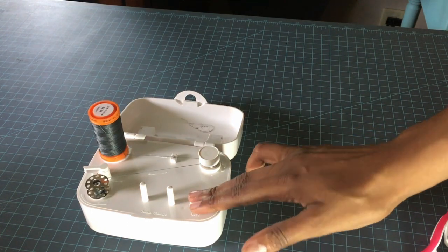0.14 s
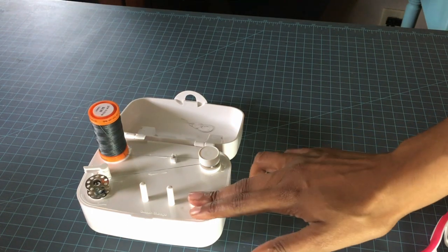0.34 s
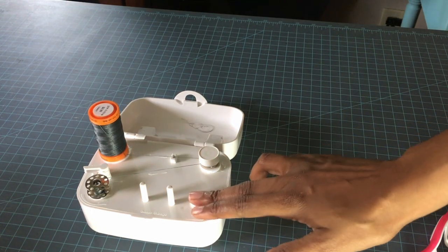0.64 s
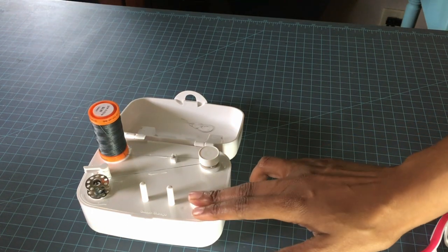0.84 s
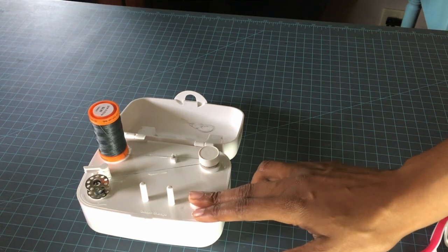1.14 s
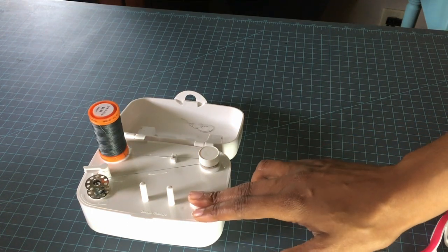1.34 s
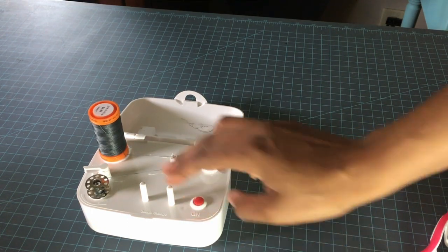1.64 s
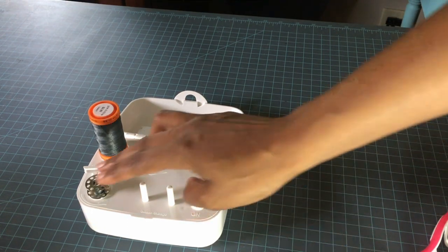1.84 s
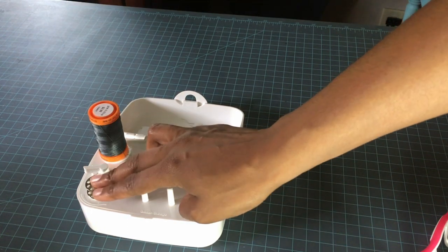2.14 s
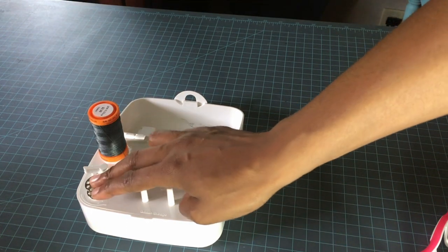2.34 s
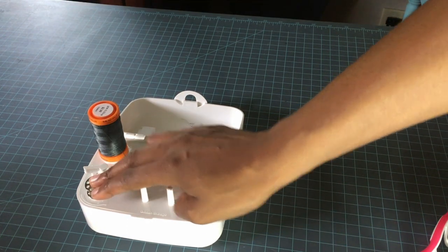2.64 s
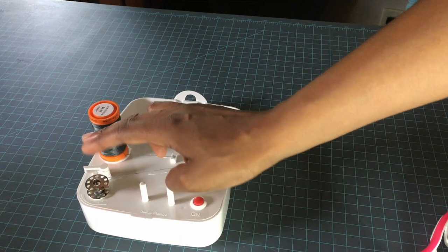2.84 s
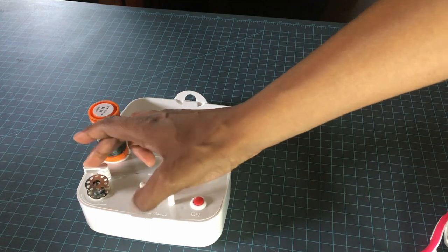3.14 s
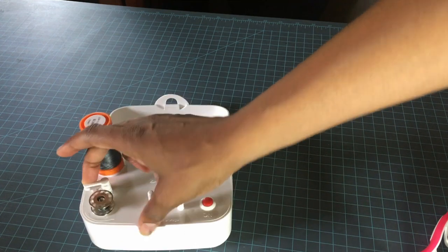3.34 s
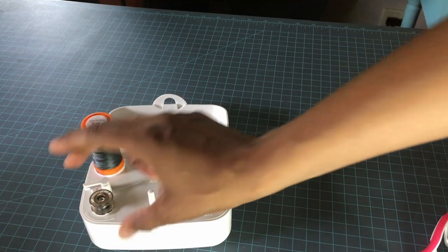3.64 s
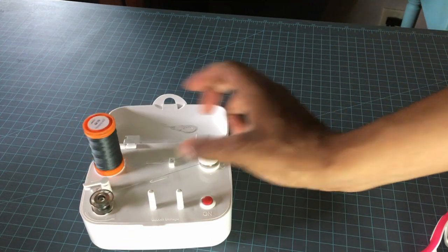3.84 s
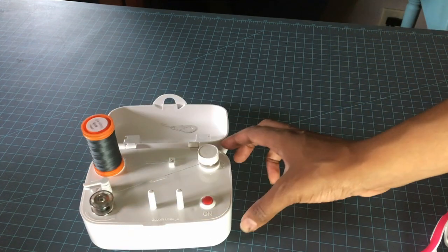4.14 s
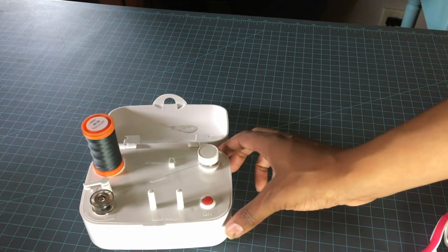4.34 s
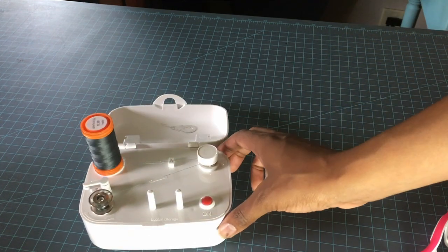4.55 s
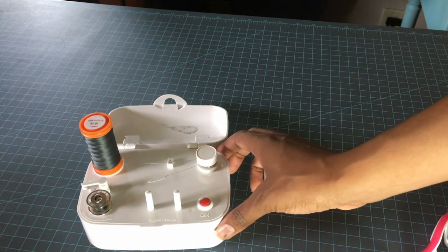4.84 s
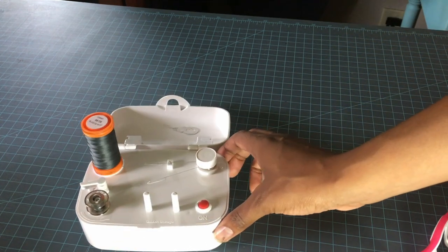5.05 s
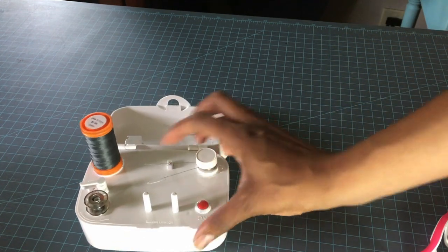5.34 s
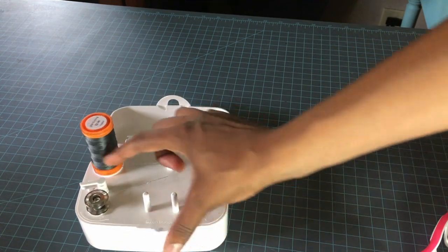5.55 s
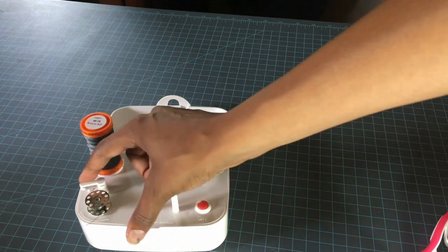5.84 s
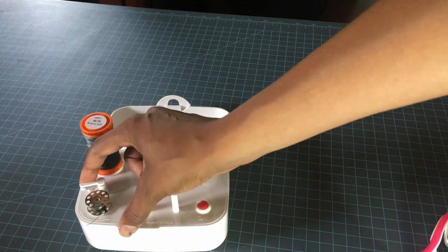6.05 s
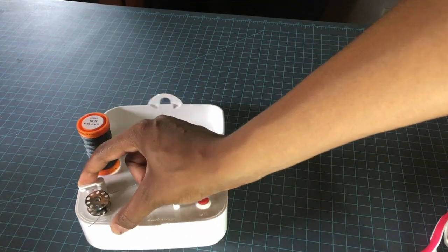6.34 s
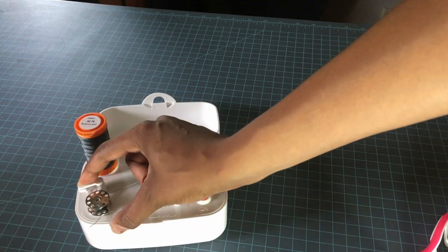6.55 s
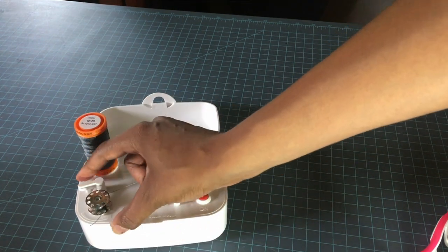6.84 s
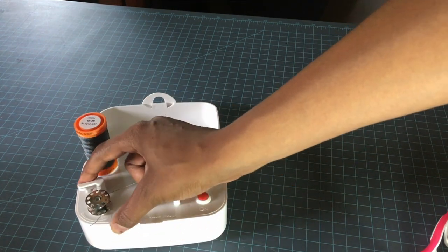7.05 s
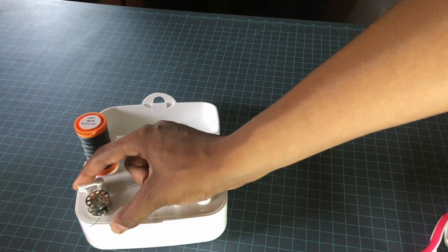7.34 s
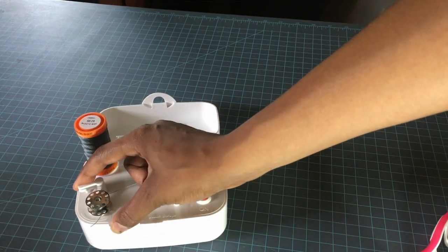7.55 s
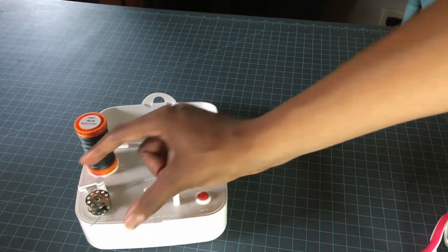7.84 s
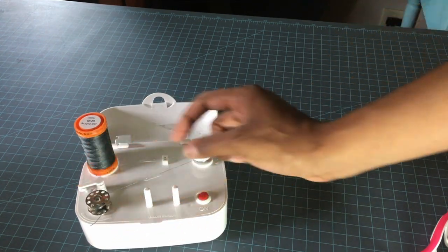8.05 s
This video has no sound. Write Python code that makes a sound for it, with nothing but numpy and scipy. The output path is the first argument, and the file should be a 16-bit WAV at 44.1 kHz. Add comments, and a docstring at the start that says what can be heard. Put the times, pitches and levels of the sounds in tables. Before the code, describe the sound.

Sharp plastic button clicks with brief ring, then a small winder whirrs up for two seconds and runs down, followed by sparse soft taps.

```python
"""The winding of a small plastic battery bobbin winder whirrs up and runs down on a cutting mat in a quiet room:
dense friction contacts excite resonances, and the thread spool rubs harder once in every turn.
Before it, the button is pressed and let go twice and fingers knock on the case, ringing its modes and the room.
Afterwards the spool creeps on once more and a few taps follow. Filtered noise gives the handling rumble,
soft thuds, brushing and still air; a wavering low tone booms in the table at each shove."""
import sys
import numpy as np
from scipy import signal
from scipy.fft import rfft, irfft, next_fast_len
from scipy.io import wavfile
from scipy.ndimage import uniform_filter1d

SR = 44100
rng = np.random.default_rng(int(sys.argv[2]) if len(sys.argv) > 2 else 0)


def master(y):
    """Save y as 16-bit WAV."""
    cut = np.clip(np.atleast_2d(y).T, -1, 1)
    pcm = np.round(cut * 32767)  # scale
    wavfile.write(sys.argv[1], SR, pcm.astype(np.int16))


N = 361619
TIME = np.arange(N) / SR   # seconds

# rubbing of the winding as it runs up and down, before unevenness and surges: time_s, level_db
RUN_LEVEL = [(3.22, -89), (3.28, -59.5), (3.38, -51), (3.46, -46), (3.6, -49.5), (3.66, -47.5),
             (3.97, -42.5), (4.4, -41.5), (4.66, -44.5), (4.74, -50.5), (5.22, -52), (5.32, -60),
             (5.4, -47.5), (5.48, -55), (5.65, -60.5), (5.75, -58), (5.84, -72.5)]
# broad spectrum of the rubbing: frequency_hz, level_db
RUN_COLOUR = [(53, -14), (90, 3), (133, 0), (237, -13), (288, -7), (373, -13), (515, -4.5), (599, -4.5),
              (1050, 0.5), (1550, -6.5), (1840, -1.5), (3290, -10.5), (3740, -21.5), (8480, -36),
              (15500, -53)]
# resonances that the rubbing excites: centre_hz, width_hz, boost_db
RUN_RESONANCES = [(126, 35, 8.5), (308, 130, 4), (509, 37, 3), (643, 155, -8.5), (1354, 110, 9),
                  (1590, 78, 3.5), (1680, 12, 10), (2490, 104, 7), (426, 71, 2.5), (3180, 180, -3.5),
                  (3530, 100, -6.5), (5470, 190, 2.5), (7830, 480, 3.5), (10570, 960, 5.5)]
# the hollow of the case colours the drone: frequency_hz, level_db
DRONE_COLOUR = [(100, -2.5), (165, -2), (240, 1), (380, 2.5), (560, 0)]
FULL_RUB_DB = -41.5   # rubbing level at full speed
DRONE_DB, DRONE_FOLLOWS = -48, 0.75   # case drone at full speed; share of the rubbing's swing in dB
HISS_DB, HISS_FOLLOWS = -51.5, 1      # the same for the hiss of the contacts
DRONE_LOW_HZ = 113   # the small case radiates little below this


def whirr(rattle_db=2.5, lurch_db=0.5, wander_db=1.5, bright_db=0.25, bright_hz=2100, drone_throb=0.82):
    """Friction excitation: uneven spool contacts drive resonances, with a case drone below and hiss above."""
    s, db = np.transpose(RUN_LEVEL)
    surge_db, speed = spool()
    uneven = from_db(rattle_db * drift(per_s=130) + lurch_db * drift(per_s=35))
    contacts = []
    for _ in range(2):
        rubbed = rubbing(per_s=3500, size_db=1.5) * uneven
        contacts.append(coloured(room(rubbed, wet_db=-5.0), RUN_COLOUR, RUN_RESONANCES))

    # the contact point wanders, so parts of the case take turns; faster rubbing is brighter
    faster = speed - np.median(speed)
    edges = np.geomspace(650, 3700, 9)   # Hz
    middle = 0
    for k, (low_hz, high_hz) in enumerate(zip(edges, edges[1:])):
        nearness = np.exp(-10 * np.log(np.sqrt(low_hz * high_hz) / bright_hz) ** 2)
        lift_db = bright_db * faster * nearness
        part = band(contacts[k % 2], (low_hz, high_hz), order=2)
        middle = middle + part * from_db(lift_db + wander_db * drift(per_s=26))
    middle = rms_one(middle) * level(s, db)

    hiss_db = HISS_DB + HISS_FOLLOWS * (db - FULL_RUB_DB)
    hiss = rms_one(band(contacts[0], 4950, "high")) * level(s, hiss_db)
    drone_db = DRONE_DB + DRONE_FOLLOWS * (db - FULL_RUB_DB)
    drone = coloured(band(contacts[1], (DRONE_LOW_HZ, 650)), DRONE_COLOUR) * level(s, drone_db)
    return (middle + hiss) * from_db(surge_db) + drone * from_db(drone_throb * surge_db)


# speed of the thread spool: time_s, speed_turns_per_s
SPOOL_SPEED = [(3.3, 6.4), (3.55, 5.6), (3.68, 8.2), (3.93, 12), (4.45, 11.9), (4.62, 9.2), (4.69, 5.5),
               (4.9, 6.1), (5.08, 4.1), (5.7, 6.5)]
BEARS_AT_S = 3.856   # one of the moments when the spool bears hardest on its pin
SURGE_DB, SURGE_SPREAD_DB = 2, 0.35   # swing of rubbing in a turn at full speed; its random variation
SURGE_DB_PER_LOST_TURN = 0.3   # the swing deepens as the spool slows, per turn a second


def spool():
    """Rotational modulation: the bearing force peaks once a turn; gives swing in dB and turns per second."""
    speed = np.interp(TIME, *np.transpose(SPOOL_SPEED))
    turns = np.cumsum(speed) / SR
    turns_from_peak = turns - np.interp(BEARS_AT_S, TIME, turns)
    bearing = np.cos(np.pi * turns_from_peak) ** 4
    lost_turns = speed.max() - speed
    depth_db = SURGE_DB + SURGE_DB_PER_LOST_TURN * lost_turns + SURGE_SPREAD_DB * drift(per_s=8)
    return depth_db * (bearing - 0.5), speed


def rubbing(per_s, size_db):
    """Friction as shot noise: dense tiny contacts at random moments, of uneven size and either sign."""
    sizes = from_db(size_db * np.minimum(rng.exponential(1, N), 5))
    signs = rng.choice([-1, 1], N)
    return sizes * signs * (rng.random(N) < per_s / SR)


# the spool creeps, as it starts and once more later: start_s, length_s, level_db
CREEPS = [(3.292, 0.054, -56), (3.4, .19, -58), (6.305, 0.071, -62.5), (6.378, 0.037, -59.5)]
# broad spectrum of the scrape: frequency_hz, level_db
TURN_COLOUR = [(65, -38), (110, -6.5), (327, -16.5), (558, -12), (809, -17.5), (1380, -12), (2220, -21),
               (2890, -21.5), (3560, -25.5), (7450, -31), (15000, -38)]
# resonances that the scrape excites: centre_hz, width_hz, boost_db
TURN_RESONANCES = [(524, 100, 2), (1020, 86, 7), (1398, 50, 18.5), (2770, 220, 10.5), (2917, 100, 15),
                   (5740, 400, 4), (7470, 320, 16), (10900, 700, 7)]


def slow_turn(catch_db=2.5):
    """Slow friction: creeping round, the spool catches on its pin and scrapes a few resonances."""
    contacts = rubbing(per_s=4100, size_db=-2.0) * from_db(catch_db * drift(per_s=200))
    scrape = coloured(contacts, TURN_COLOUR, TURN_RESONANCES)
    return scrape * swells(CREEPS, rise_db_per_s=598, fall_db_per_s=316)


# button snaps and finger taps on the case, before the common trim of blows():
# start_s, strength_db, body_db (hollow body), ring_db (main ring), brightness_db_per_octave
BLOWS = [(-0.1, -38, -4, 7, 2.5), (0.18, -62.5, -18, -6, -5), (0.2304, -36.5, 1.5, -0.5, -0.1),
         (0.311, -55, 6.5, 5.5, -5), (0.5645, -78, 11, 0, -4), (0.922, -36.5, 3, 9, -6),
         (1.2623, -36.5, 0, -0.5, -0.7), (1.5049, -36.5, 4.5, 7, -4.5), (1.558, -55, -9, 9, -0.5),
         (2.036, -90.5, 18.5, 18, -3.5), (2.464, -72.5, 24.5, 5, -11.5), (2.5342, -70, 8, 3.5, -7),
         (2.7617, -82, 16, 9.5, -8), (2.779, -85.5, 8, 9, -5.5), (3.0094, -55.5, -2.5, 5, -1),
         (3.0393, -54.5, -16, -4.5, -16.5), (5.8524, -63, 8, 7.5, -10), (6.6475, -56.5, -6, 5.5, -14),
         (7.1615, -63, -7, -1, -8), (7.407, -87, 8, 7, -4.5), (7.647, -44, -11.5, 5.5, -10.5)]


def blows(trim_db=-1.0):
    """Superposition of impacts: snaps and taps on one time line, the first already dying away at the start."""
    out = np.zeros(N + 2 * SR)   # one spare second at each end
    for s, *touch in BLOWS:
        band_db = registers(*touch)
        add(out, blow(band_db), s + 1)
        add(out, spring(band_db[-2]), s + 1)
    return from_db(trim_db) * out[SR:SR + N]


# registers in which a blow is weighted: low_hz, high_hz
BLOW_BANDS = [(170, 650), (650, 1100), (1100, 1550), (1550, 2150), (2150, 3300), (3300, 7000),
              (7000, 16000)]
BASS_DB, UPPER_RING_DB, TOP_DB = -12.5, 0.4, -4.5   # bass, upper ring and top of a plain blow


def registers(strength_db, body_db, ring_db, db_per_octave):
    """Contact hardness: a full-bodied blow reaches the bass, a harder contact is brighter; dB per register."""
    centres = np.sqrt(np.prod(BLOW_BANDS, axis=1))
    octaves_up = np.maximum(np.log2(centres / centres[3]), 0)
    bass_db = BASS_DB + max(body_db, 0)
    spot_db = np.array([bass_db, body_db, ring_db, 0, UPPER_RING_DB, 0, TOP_DB])
    return strength_db + spot_db + db_per_octave * octaves_up


# modes of the hollow plastic case: frequency_hz, level_db, t60_s
CASE_MODES = [(277, -17.5, 0.11), (496, -31, 0.066), (773, -11.5, 0.046), (873.4, -5.5, 0.058),
              (952, -0.5, 0.039), (1028, -6, 0.017), (1224, -12, 0.059), (1308, -0.5, 0.071),
              (1356, -4, 0.056), (1702, -3.5, 0.084), (1805, -5.5, 0.062), (2010, -11, 0.048),
              (2327, -3, 0.056), (2806, -9.5, 0.091), (3310, -15, 0.048), (3450, -6, 0.049),
              (4020, -15, 0.034), (4200, -14.5, 0.037), (4620, -13, .04), (5646, -6, 0.041),
              (5660, -14, .03), (7420, -10.5, 0.054), (8150, -19, .025), (9880, -17, .02),
              (12100, -25, 0.013)]
# the crowd of weak, short modes between them: frequency_hz, level_db
CRACK_COLOUR = [(150, -16), (300, -8.5), (490, -18), (900, -2.5), (1400, -1.5), (2400, -1), (3500, -10),
                (6000, -11), (10000, -17.5), (13000, -25), (16000, -43.5)]
# reverberation of the room: frequency_hz, t60_s
ROOM_T60 = [(150, 0.33), (500, 0.28), (1300, 0.27), (3000, 0.3), (7000, 0.17), (14000, 0.25)]


def blow(band_db, crack_db=1.5, crack_t60=0.025, spread_db=4.0, room_db=-6.5, room_ring_db=-3.0,
         gap_s=0.004, late_db=-11.5, late_t60=0.42):
    """Modal synthesis: an impact rings the case, then the room; the contact sets each register's weight."""
    t = np.arange(20480) / SR
    attack = round(0.015 * SR)
    hz, db, t60 = np.transpose(CASE_MODES)[:, :, None]
    strength = from_db(db + spread_db * rng.standard_normal(db.shape))
    short = t[:SR // 10]
    # the modes start roughly in step, which makes the front edge sharp
    lag = 1.3 * rng.standard_normal(db.shape)   # radians
    modes = strength * np.cos(2 * np.pi * hz * short - lag) * from_db(-60 * short / t60)
    ring = np.sum(modes, axis=0)
    crack = from_db(-60 * t / crack_t60) * coloured(rng.standard_normal(len(t)), CRACK_COLOUR)
    direct = np.pad(ring / np.std(ring[:attack]), (0, len(t) - len(ring)))
    direct = direct + from_db(crack_db) * crack / np.std(crack[:attack])

    # the reflections carry the colour of both ring and crack, with scrambled phase
    noise = rng.standard_normal(len(t) + len(ring) - 1)
    scrambled = rms_one(signal.fftconvolve(noise, ring, "valid"))
    diffuse = from_db(room_ring_db) * scrambled + coloured(rng.standard_normal(len(t)), CRACK_COLOUR)
    diffuse_spectrum = rfft(diffuse)
    bin_hz = np.arange(len(t) // 2 + 1) * SR / len(t)
    # silent for one gap, then rising to full over another
    arrival = from_db(room_db) * np.clip(t / gap_s - 1, 0, 1)
    tail, touch = 0, []
    for (low, high), register_db in zip(BLOW_BANDS, band_db):
        centre = np.sqrt(low * high)
        own = np.std(band(direct[:attack], (low, high)))
        early = from_db(-60 * t / at_hz(ROOM_T60, centre))
        late = from_db(late_db - 60 * t / late_t60)
        inside = np.abs(bin_hz - (low + high) / 2) < (high - low) / 2
        reflected = rms_one(irfft(diffuse_spectrum * inside))
        tail = tail + own * reflected * arrival * np.hypot(early, late)
        touch.append((centre, register_db - 20 * np.log10(own)))
    return shade(band(direct, 100, "high", order=2) + tail, touch)


# modes of the switch spring: frequency_hz, level_db (relative to the blow's treble), t60_s
SPRING_MODES = [(2210, -3.5, 0.057), (2430, 1.5, 0.11), (2410, -15, 0.32), (4020, -16.5, .19),
                (4300, -17.5, 0.12), (4600, -13.5, 0.06), (5870, -6, 0.052)]


def spring(treble_db, spread_db=2.5):
    """Modal decay: narrow spring modes, some outlasting the case, ring as loudly as the blow's treble drives."""
    t = np.arange(SR // 3) / SR
    hz, db, t60 = np.transpose(SPRING_MODES)[:, :, None]
    strength = treble_db + db + spread_db * rng.standard_normal(db.shape)
    return np.sum(from_db(strength - 60 * t / t60) * np.sin(2 * np.pi * hz * t), axis=0)


# tiny dry ticks: start_s, impulse_db (peak before the low-pass)
TICKS = [(0.753, -34.5), (2.0763, -34.5), (3.401, -38), (6.047, -49), (7.371, -52)]


def ticks():
    """Impulse excitation: single sharp ticks, low-passed, with no resonant ring."""
    out = np.zeros(N)
    for s, db in TICKS:
        out[round(s * SR)] = from_db(db)
    return band(out, 7200, "low", order=2)


# fingertips land softly on the case, before the trim: start_s, level_db
THUDS = [(0.0, -73), (0.234, -54), (0.555, -70), (0.927, -55), (1.268, -66), (1.508, -56.5), (2.045, -66),
         (2.375, -62), (2.468, -53.5), (2.705, -62.5), (2.765, -58.5), (3.019, -54), (3.225, -66),
         (3.325, -58), (3.67, -54), (5.22, -54), (5.55, -57.5), (6.23, -64.5), (6.39, -65), (6.909, -67),
         (7.65, -61)]
# spectrum of a soft landing: frequency_hz, level_db
THUD_COLOUR = [(55, -8), (80, -5.5), (105, -6.5), (130, 2), (170, -13), (260, -17), (400, -38.5),
               (700, -70)]


def thuds(trim_db=-1.0, hold_s=0.038):
    """Soft impact: a yielding fingertip excites mainly low frequencies, as short swells of dull noise."""
    rows = [(s, hold_s, db + trim_db) for s, db in THUDS]
    landing = swells(rows, rise_db_per_s=1499, fall_db_per_s=206.5)
    return coloured(rng.standard_normal(N), THUD_COLOUR) * landing


# fingers brush the case: start_s, level_db
BRUSHES = [(2.42, -83), (6.53, -76), (6.615, -77.5), (6.89, -76), (7.04, -83.5), (7.23, -75)]


def brush(hold_s=0.005):
    """Light friction: sparse skin contacts excite the crowd of case modes."""
    rows = [(s, hold_s, db) for s, db in BRUSHES]
    stroking = swells(rows, rise_db_per_s=322, fall_db_per_s=260)
    peaks = [(1355, 86, 13.5), (5917, 6000, -16)]   # centre_hz, width_hz, boost_db
    return coloured(rubbing(per_s=670, size_db=2.0), CRACK_COLOUR, peaks) * stroking


# the hand shoves the case and the table booms: start_s, length_s, level_db
SHOVES = [(0.28, 0.03, -39), (1.54, 0.069, -48), (2.06, 0.065, -39), (3.36, 0.025, -30), (3.58, .05, -37),
          (6.24, 0.045, -43.5), (6.92, 0.053, -38.5)]
TABLE_HZ, TABLE_WANDER = 40.7, 1.2   # pitch of the boom; its unsteadiness in radians


def table():
    """Low structural resonance: a shove sets the table top swinging for a few cycles."""
    swing = np.sin(2 * np.pi * TABLE_HZ * TIME + TABLE_WANDER * drift(per_s=17))
    shoves = swells(SHOVES, rise_db_per_s=398, fall_db_per_s=155)
    return band(swing * shoves, 60, "low")


# deep rumble of handling, before the trim: time_s, level_db
HANDLING_LEVEL = [(0.0, -52), (0.45, -44), (0.7, -50), (1.55, -50), (1.9, -56), (2.55, -39), (3.15, -44.5),
                  (3.55, -31), (3.95, -39), (5.25, -43), (5.95, -52.5), (6.35, -41.5), (6.75, -42),
                  (7.12, -52.5), (7.33, -39), (7.7, -47.5), (8.2, -56.5)]
# spectrum of the rumble: frequency_hz, level_db
RUMBLE_COLOUR = [(6, -16.5), (11, 15.5), (20, 3.5), (30, -8.5), (44, -6.5), (54, -22), (65, -23.5),
                 (90, -39.5), (200, -90)]


def rumble(trim_db=4.5):
    """Low-frequency noise: moving hands give a deep rumble whose own fluctuations are evened out."""
    sway = coloured(rng.standard_normal(N), RUMBLE_COLOUR)
    power = uniform_filter1d(sway ** 2, SR // 6)
    sway = band(sway / np.sqrt(power + 0.09), 100, "low")
    return from_db(trim_db) * sway * level(*np.transpose(HANDLING_LEVEL))


# spectrum of the still air: frequency_hz, level_db
AIR_COLOUR = [(59, -28), (100, -4.5), (188, -11), (438, -17.5), (898, -21.5), (1340, -23.5), (1490, -23.5),
              (2270, -28.5), (15500, -33.5)]


def air(level_db=-79.5):
    """Stationary random noise: the still air of the room as a steady, coloured background."""
    return from_db(level_db) * coloured(rng.standard_normal(N), AIR_COLOUR)


def room(x, wet_db, t60=0.42):
    """Reverberation: exponentially decaying diffuse reflections thicken a continuous sound."""
    t = np.arange(SR // 3) / SR
    tail = rng.standard_normal(len(t)) * from_db(-60 * t / t60)
    tail = tail / np.sqrt(np.sum(tail ** 2))
    return x + from_db(wet_db) * signal.fftconvolve(x, tail)[:len(x)]


def coloured(x, spectrum, peaks=()):
    """Source-filter principle: give a steady sound a broad spectrum and resonant peaks; rms 1."""
    size = next_fast_len(len(x))
    hz = np.arange(size // 2 + 1) * SR / size
    db = at_hz(spectrum, hz)
    for centre, width, boost in peaks:
        db = db + boost / (1 + (2 * (hz - centre) / width) ** 2)
    return rms_one(irfft(rfft(x, size) * from_db(db), size)[:len(x)])


def shade(x, spectrum):
    """Minimum-phase filtering: nothing sounds early and the front edge stays sharp."""
    size = next_fast_len(2 * len(x), True) // 2 * 2
    hz = np.arange(size // 2 + 1) * SR / size
    cepstrum = irfft(np.log(from_db(at_hz(spectrum, hz))))
    # folding the cepstrum onto positive time makes the filter causal
    cepstrum[1:size // 2] *= 2
    cepstrum[size // 2 + 1:] = 0
    return irfft(rfft(x, size) * np.exp(rfft(cepstrum)))[:len(x)]


def band(x, hz, kind="band", order=3):
    """Causal filtering: a Butterworth band-, low- or high-pass."""
    return signal.sosfilt(signal.butter(order, hz, kind, fs=SR, output="sos"), x)


def drift(per_s):
    """Random modulation: straight lines between normal random knots of spread 1."""
    knots = rng.standard_normal(N // 40)
    return np.interp(TIME * per_s, np.arange(len(knots)), knots)


def level(s, db, fade_db_per_s=300):
    """Amplitude envelope: gain in time from a dB curve, dying away outside it."""
    outside = np.abs(TIME - np.clip(TIME, s[0], s[-1]))
    return from_db(np.interp(TIME, s, db) - np.minimum(fade_db_per_s * outside, 120))


def swells(rows, rise_db_per_s, fall_db_per_s):
    """Exponential envelope: each (start_s, length_s, level_db) rises, holds and dies away; the loudest wins."""
    curves = []
    for s, length, top in rows:
        rise = rise_db_per_s * np.maximum(s - TIME, 0)
        fall = fall_db_per_s * np.maximum(TIME - s - length, 0)
        curves.append(top - rise - fall)
    return from_db(np.maximum(np.max(curves, axis=0), -160))


def at_hz(points, hz):
    """Logarithmic pitch scale: read a table on a log-frequency axis."""
    f, value = np.transpose(points)
    return np.interp(np.log(np.maximum(hz, 1)), np.log(f), value)


def from_db(db):
    """Decibel scale: 20 dB is a factor of ten in amplitude."""
    return 10 ** (np.asarray(db) / 20)


def rms_one(x):
    """Effective value: scale to unit rms."""
    return x / np.sqrt(np.mean(x ** 2) + 1e-20)


def add(out, sound, s):
    """Superposition: mix a sound in at a given time."""
    start = round(s * SR)
    out[start:start + len(sound)] += sound


def scene():
    """Linear superposition of the winder, the hands, the table and the still air of the room."""
    winder = whirr() + slow_turn()
    hands = blows() + ticks() + thuds() + brush() + rumble()
    return (winder + hands + table() + air())[None]


def record(dry):
    """Band limitation: a steep elliptic low-pass at 15750 Hz cuts the top."""
    return signal.sosfilt(signal.ellip(10, 0.1, 70, 15750, fs=SR, output="sos"), dry)


dry = scene()
out = record(dry)
master(out)
```